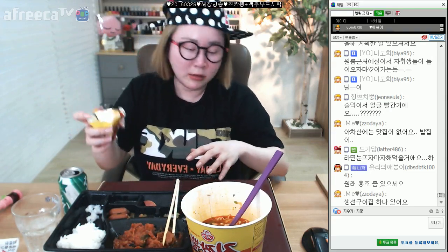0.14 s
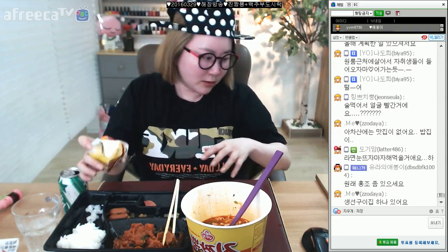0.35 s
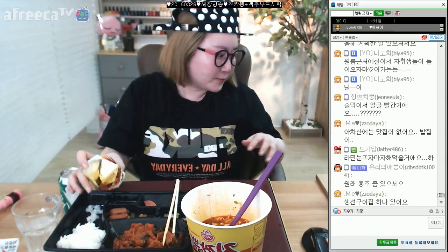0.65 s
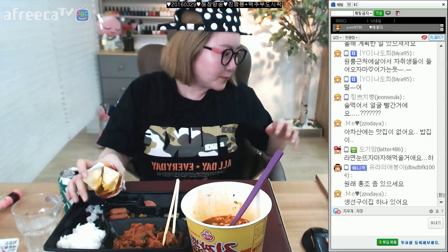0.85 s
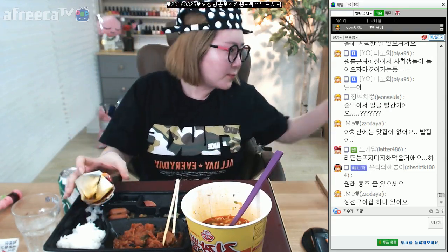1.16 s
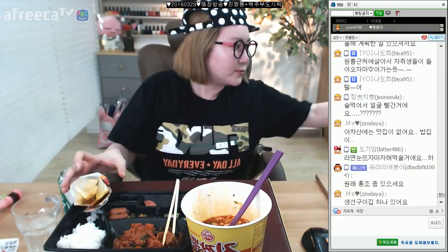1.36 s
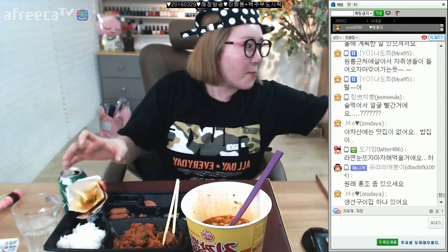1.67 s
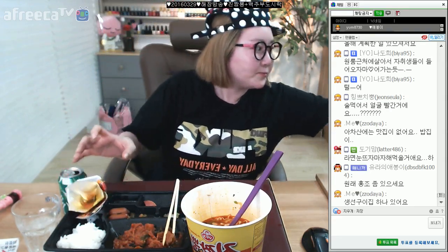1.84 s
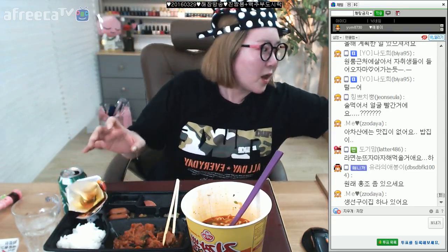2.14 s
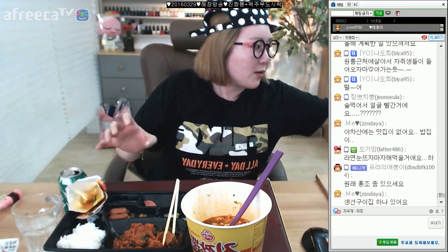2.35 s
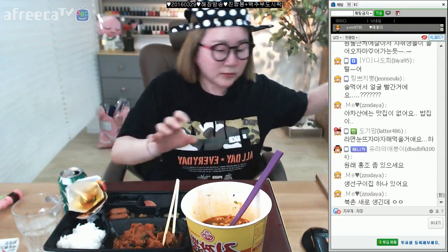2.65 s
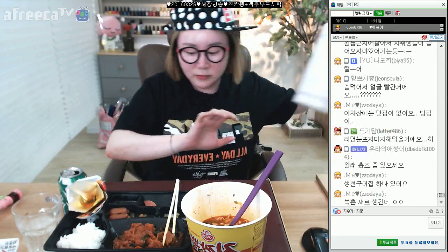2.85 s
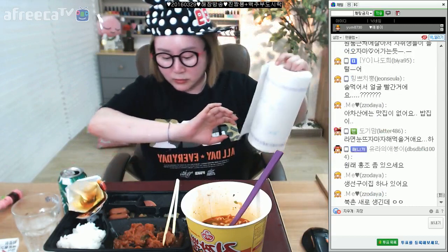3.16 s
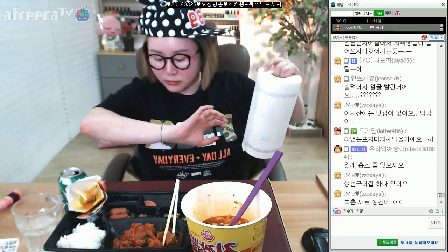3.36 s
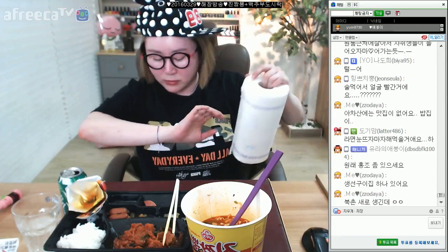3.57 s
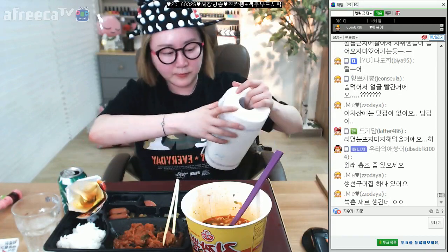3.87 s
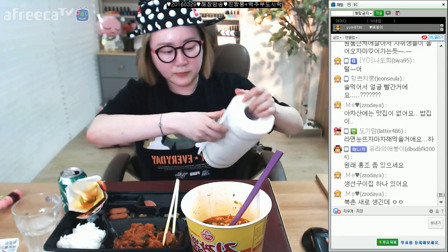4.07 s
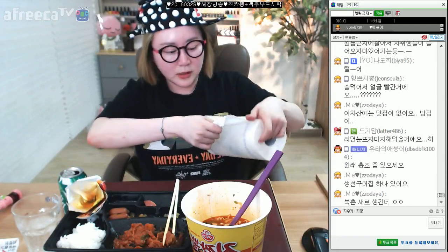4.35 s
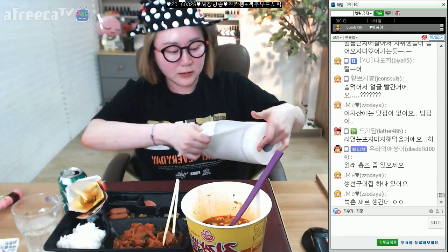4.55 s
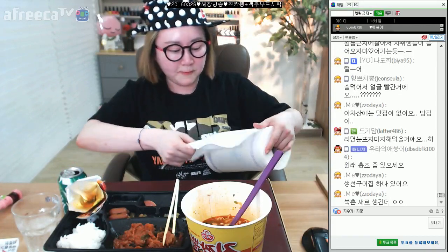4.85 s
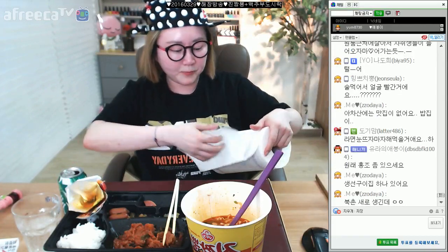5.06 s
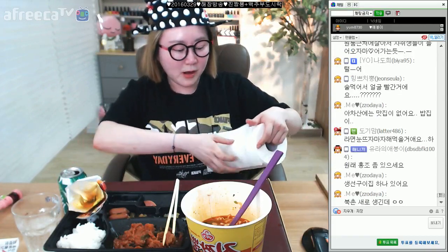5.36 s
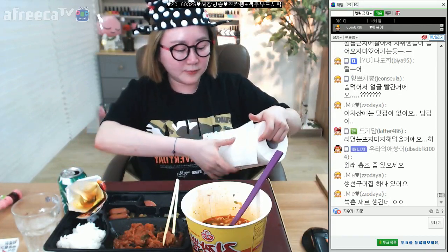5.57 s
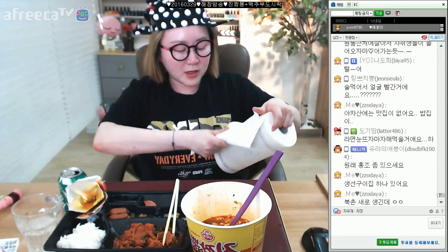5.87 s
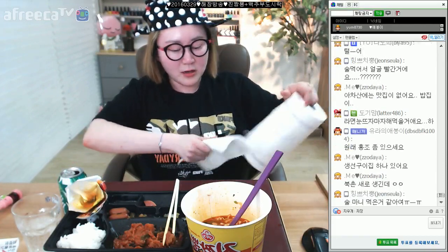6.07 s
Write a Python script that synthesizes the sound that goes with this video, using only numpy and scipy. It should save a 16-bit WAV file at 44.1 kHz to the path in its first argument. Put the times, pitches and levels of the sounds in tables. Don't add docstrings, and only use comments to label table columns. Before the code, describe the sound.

In a humming small room, wrapper crinkles, sharp wooden knocks and hollow cardboard bumps lead to paper rubbing and a loud final tear.

```python
import sys
import numpy as np
from scipy import signal
from scipy.fft import rfft, irfft, next_fast_len
from scipy.io import wavfile
from scipy.ndimage import uniform_filter1d, minimum_filter1d, map_coordinates

SR = 44100
rng = np.random.default_rng(int(sys.argv[2]) if len(sys.argv) > 2 else 0)


def field_ratio(decibels):
    return 10 ** (np.asarray(decibels, dtype=float) / 20)


def wrap_up_sound(samples):
    columns = np.atleast_2d(samples).T
    tamed = np.clip(columns, -1, 1)
    steps = np.round(tamed * 32767).astype(np.int16)
    wavfile.write(sys.argv[1], SR, steps)


N = 273993
TIME = np.arange(N) / SR
SPLIT_HZ = 3000

# [f/Hz, level/dB]
HUM = [(58.54, -32), (100.5, -74.5), (120, -61), (145.5, -58.5), (203, -79), (218, -64)]
# [f/Hz, level/dB per Hz]
AIR = [(15, -17), (40, -26), (80, -26), (110, -26), (250, -32.5), (400, -32.5), (766, -35.5), (877, -40.5),
       (1030, -34.5), (2380, -54), (5000, -60), (6500, -53.5), (10000, -64.5), (15700, -63)]
# [f/Hz, time to fall 60 dB/s]
ROOM = [(150, 0.3168), (1000, 0.23813), (4000, 0.31366), (12000, 0.255)]

# [peak t/s, swell t/s per 20 dB, release t/s per 20 dB, pressure level/dB, hiss over body level/dB]
CLOTH = [(.16, 0.414, 1.655, -57.5, -23), (.7, 1.222, 0.1208, -61.5, -4), (1.2, 0.1227, 0.7995, -52, -5.5),
         (1.3, 0.1886, 0.598, -57, -16), (1.46, 0.2102, 0.1733, -52, -11.5),
         (1.52, 0.1473, 0.08726, -58.5, 8), (1.56, 0.1172, 0.03123, -47, -10.5),
         (1.78, 1.024, 0.328, -58, -6.5)]
WRAPPER = [
    (.766, 0.7, 0.453, -70.5, -18.5),
    (.8, -0.0028, 0.0869, -51.5, -22.5),
    (.908, 0.3168, -0.2951, -43.5, -5),
    (.966, 0.2021, 0.2206, -40.5, -3),
]
SLIDE = [
    (1.97, 0.0635, 0.1492, -64.5, -17.5),
    (2.04, 0.06694, 0.083, -38.5, 6.5),
    (2.075, 0.0687, 0.03796, -37.5, 2),
    (2.16, 0.2393, 0.2058, -48, -16),
]
SLEEVE = [(2.238, 0.0408, 0.02587, -44.5, -4), (2.27, 0.0505, 0.4346, -53, -4.5),
          (2.488, 0.1045, 0.2911, -47.5, -8.5), (2.578, 0.0313, 0.12615, -44, 0.5),
          (2.63, 0.094, 0.1511, -49, 1), (3.024, 0.7045, 0.7564, -51.5, -8), (3.44, 1, 0.248, -59.5, -26.5),
          (3.68, 0.25, 0.2714, -55, -11.5)]
GRIP = [
    (3.84, 0.05394, 0.958, -50.5, 0.5),
    (3.95, 0.032, 0.0706, -40, -5),
    (4.045, 0.0794, 0.0672, -29, -11),
    (4.078, 0.0465, 0.0245, -33, -19.5),
    (4.16, 0.2244, 0.0542, -50.5, 6.5),
]
PAPER = [(4.292, 0.1209, 0.13805, -37, -5.5), (4.42, 0.3525, 0.3474, -47, -1),
         (4.484, 0.0628, 0.4845, -37.5, -7.5), (4.61, 0.528, 0.46, -39, -7),
         (4.796, 0.03225, 0.321, -38.5, -6), (4.93, 0.422, 0.517, -54, -12.5),
         (5.04, 0.08075, 0.02597, -45.5, -2)]
FOLD = [(5.09, 0.02686, 0.1046, -52, -5), (5.268, 0.1224, 0.3832, -50.5, -2.5),
        (5.582, 0.02441, 0.04078, -36, -9.5), (5.608, 0.00704, 0.03504, -40.5, -8.5),
        (5.718, 0.07184, 0.0546, -37.5, -7.5), (5.788, 0.1386, 0.2467, -35.5, -8.5),
        (5.9, 0.3654, 0.01319, -43, 2)]
TEAR = [
    (5.92, 0.01101, 0.0582, -17.5, -3),
    (5.962, 0.05134, 0.06599, -16, -17),
    (5.995, 0.04296, 0.0204, -17.5, -22),
    (6.05, 0.0966, 0.832, -48.5, -8),
]

# [f/Hz, level/dB per Hz]
CLOTH_TONE = [(180, -35), (300, -2.5), (372, -4), (439, -4), (485, -9), (686, -1.5), (1310, -11.5),
              (2410, -7.5), (3150, -10), (7320, -11), (15700, -31.5)]
WRAPPER_TONE = [(200, -3), (620, -4.5), (900, -2.5), (1400, -10), (1800, -3.5), (2000, -2), (2300, -10),
                (3500, -14), (5000, -19.5), (6500, -12.5), (8000, -29), (11000, -24), (15700, -46)]
SLIDE_TONE = [(180, -37), (300, -18), (446, -25.5), (527, 0), (783, -14), (1060, -14), (2230, -13.5),
              (2410, 2), (2600, -9.5), (3530, -6.5), (6000, -9.5), (8080, -0.5), (15700, -21)]
SLEEVE_TONE = [(180, -58.5), (300, -12.5), (321, -7.5), (509, -16), (664, -8), (1200, -15), (1330, -20),
               (1600, -14), (9700, -14), (15700, -25)]
GRIP_TONE = [(59, -81), (100, -14), (412, -7), (616, -4.5), (685, -18), (762, 6.5), (846, -4.5), (1160, 3),
             (1700, -5.5), (3490, -26.5), (4220, -36), (6310, -30.5), (15700, -46)]
PAPER_TONE = [(59, -42.5), (100, -8.5), (146, -5), (173, -18.5), (307, -9), (371, -8.5), (404, -4),
              (1110, -0.5), (2440, -6.5), (4130, -19.5), (7020, -18.5), (11900, -28), (15700, -34.5)]
FOLD_TONE = [(59, -44.5), (100, -7), (153, -2), (189, -28), (288, -0.5), (341, -16.5), (449, -3),
             (2010, -6), (5110, -8.5), (7320, -5), (15700, -22.5)]
TEAR_TONE = [(47, -55), (80, -18), (130, -20), (194, -27.5), (571, -13.5), (610, -4.5), (795, -12),
             (888, -11.5), (1110, -5), (1400, -14.5), (1970, -10), (6480, -26.5), (15700, -41.5)]

# [t/s, peak level/dB, ring f/Hz, fizz over ring level/dB]
TICKS = [(0.1364, -30, 2229, -9.5), (0.2702, -48, 1342, -1.5), (0.6487, -47, 1624, -3),
         (0.7987, -31.5, 2062, -8.5), (0.8817, -22, 2014, -15.5), (0.9056, -24, 1924, -14.5),
         (0.9107, -23, 2015, -21.5), (0.9249, -28.5, 2196, -9), (0.9327, -26.5, 1929, -7),
         (0.9665, -29, 904.5, -5), (0.9706, -21, 1811, -7.5), (0.978, -38.5, 3046, 1.5),
         (0.9994, -36, 1930, 5), (1.4106, -40, 2493, -9), (1.5292, -22.5, 3031, -13.5),
         (1.5300, -23.5, 2191, -21), (2.2278, -38.5, 2486, -2.5), (4.771, -36, 1591, 2.5),
         (5.332, -56.5, 1500, 1), (5.3472, -47, 1595, 8), (5.042, -34.5, 2548, -13),
         (5.3705, -45, 1299, -1), (5.5243, -38.5, 1287, -11), (5.5598, -35.5, 1235, -11.5)]
PUFFS = [(0.709, -47.5, 1987, -6.5), (0.763, -40.5, 1068, 5), (1.079, -28.5, 2381, -8.5),
         (2.574, -24.5, 1508, -8.5), (3.936, -20.5, 1204, -21), (3.946, -17.5, 1554, -20.5),
         (4.004, -24, 1259, -19.5), (4.031, -15.5, 3539, -15), (4.045, -15, 1139, -24.5),
         (4.074, -23, 780, -20), (2.212, -22, 883.8, -30), (4.321, -19.5, 2010, -10.5),
         (4.375, -26.5, 632.4, -25), (4.520, -21.5, 1014, -19), (4.569, -20, 1209, -14),
         (4.582, -27, 647.6, -25.5), (4.605, -29.5, 552.3, -25), (4.660, -26.5, 445, -28),
         (4.840, -23, 691, -20.5), (4.860, -22, 1051, -17.5), (4.920, -28, 676.2, -25.5),
         (5.012, -37.5, 704.3, -20), (5.078, -29, 902.6, -17), (3.990, -24.5, 1131, -20),
         (4.033, -13.5, 1191, -23), (4.066, -23.5, 935, 1.5), (4.237, -21.5, 2145, -7),
         (4.281, -30.5, 1460, -13.5), (4.489, -17.5, 1512, -15.5), (4.650, -30, 1362, -21),
         (4.793, -26, 890.4, 5), (5.572, -19, 1154, -15.5), (5.603, -18, 1111, -22),
         (5.605, -19, 2181, -17), (5.709, -19, 1963, -20.5),
         (.967, -10, 5000, -10.5), (0.63, -29.5, 6000, -10), (0.81, -34.5, 6400, -9.5),
           (1.2, -48.5, 1700, -21), (5.267, -31.5, 9000, 2), (4, -28, 2100, -25)]
RIPS = [(5.9085, -21, 2811, -1), (5.911, -10, 1257, -7.5), (5.9135, -16.5, 2747, -8),
        (5.9165, -16.5, 2497, -5.5), (5.9235, -15, 2598, -12.5), (5.938, -14.5, 1513, -16.5),
        (5.9415, -17.5, 2010, -8.5), (5.944, -18, 2569, -12.5), (5.9515, -6, 1095, -27),
        (5.9835, -5, 1962, -14), (5.990, -13.5, 795.3, -11.5), (6.020, -26.5, 1405, -25.5),
        (5.9195, -5.5, 2916, -3.5), (5.922, -9.5, 1624, -7), (5.926, -6.5, 788.5, -24.5),
        (5.930, -19.5, 2379, -20), (5.9335, -10.5, 1195, -22), (5.9465, -19.5, 2199, -10),
        (5.9495, -3.5, 1122, -26), (5.9585, 2, 1034, -25.5), (5.965, -4.5, 1131, -22.5),
        (5.975, -12, 877.2, -30), (5.9805, -1, 1032, -20.5), (5.987, -23.5, 1495, -14.5),
        (5.998, -8.5, 750, -24.5), (6.005, -14, 856.7, -15)]
# [f/Hz, level/dB per Hz]
FIZZ = [(2500, -17), (5000, 11), (7500, 12), (11000, -4), (15800, -13.5)]

# [t/s, peak level/dB]
KNOCK = [(1.824, -9.5), (1.831, -8), (1.841, -8.5), (1.849, -13), (1.869, -18), (1.878, -32.5),
         (1.891, -33.5)]
THUMP = [(1.8235, -3)]
SLAP = [(2.083, -17)]
PUSHES = [(.7987, -27.5), (4.036, -45.5), (4.072, -39.5), (4.238, -42.5), (4.282, -36), (5.347, -35.5),
          (5.71, -33.5)]
BUMP = [2.097, 2.118, 2.138, 2.165, 2.183, 2.205, 2.238, 2.285]

# [f/Hz, level/dB, time to fall 60 dB/s]
SHELF = [(210.26, -2.5, 0.1249), (276.9, -8.5, 0.0844), (391.77, -8.5, 0.19), (467, -21.5, 0.0689),
         (521.6, -9.5, 0.0836), (602.57, -7.5, 0.1048), (750, -10, 0.068), (911.6, -16.5, 0.078),
         (1022, 3, 0.07734)]
PANEL = [(150.49, -4, 0.17625), (171.8, -5.5, 0.1211), (192.43, -15, 0.08355)]
CORE = [(398.3, -28.5, 0.0761), (560.16, -5.5, 0.1125), (636.31, 2.5, 0.1448), (684, -20.5, 0.0421),
        (780, -4.5, 0.0769), (872.77, -8.5, 0.198)]
PALM = [(219.66, 1, 0.03845)]

# [f/Hz, level/dB per Hz]
SHELF_TONE = [(90, -55.5), (130, -15.5), (230, -9.5), (400, -2.5), (620, -1.5), (950, -7.5), (1440, -16.5),
              (1800, -13), (3370, -20), (7270, -34.5), (13600, -42), (15700, -53)]
CORE_TONE = [(71, -51.5), (120, -24.5), (326, -19.5), (416, -8), (500, -8.5), (638, -2.5), (707, -13.5),
             (767, -10), (2170, -31.5), (7370, -39.5), (15700, -49.5)]
SLAP_TONE = [(71, -42), (120, -1.5), (313, -12.5), (1110, 0), (2260, -8), (3470, -9), (5210, -14),
             (8330, -14), (15700, -39)]

# [f/Hz, bar over the nearby level/dB]
THINNING = [(4000, -30), (7000, -9), (9000, -3), (11000, 0), (15000, 3)]


def unit(x):
    return x / np.sqrt(np.mean(x ** 2) + 1e-20)


def along(points, hz):
    f, v = np.transpose(points)
    return np.interp(np.log(hz + 1), np.log(f + 1), v)


def wobble(rate, size=N):
    knots = rng.standard_normal(int(size * rate / SR) + 4)
    return map_coordinates(knots, [TIME[:size] * rate])


def filtered(x, response):
    m = next_fast_len(len(x) + 8192)
    return irfft(rfft(x, m) * response(np.fft.rfftfreq(m, 1 / SR)), m)[:len(x)]


def causal(tone, size=4096):
    gain = field_ratio(along(tone, np.fft.rfftfreq(size, 1 / SR)))
    ceps = irfft(np.log(gain + 1e-6), size)
    ceps[1:size // 2] *= 2
    ceps[size // 2 + 1:] = 0
    h = irfft(np.exp(rfft(ceps)), size)
    return h / np.linalg.norm(h)


def add(track, s, sound):
    part = track[round(s * SR):][:len(sound)]
    part += sound[:len(part)]


def patchy(depth_db, size):
    z = signal.stft(rng.standard_normal(size), nperseg=256)[2]
    field = uniform_filter1d(rng.standard_normal(z.shape), size=4, axis=0)
    field = uniform_filter1d(field, size=5, axis=1)
    noise = signal.istft(z * field_ratio(depth_db * unit(field)), nperseg=256)[1]
    return unit(noise[:size])


def room(x):
    hz, t, z = signal.stft(rng.standard_normal(min(len(x), SR // 3)), SR, nperseg=256)
    decay = field_ratio(-60 * t / along(ROOM, hz)[:, None])
    tail = signal.istft(z * decay, SR, nperseg=256)[1]
    delayed = np.pad(x, (200, 0))
    return signal.fftconvolve(delayed, tail / np.linalg.norm(tail))[:len(x)]


def rub(strokes, tone, grains, slips_db, patchy_db, flutter_db, hiss_grows):
    s, rise, fall, press_db, hiss_db = np.transpose(strokes)[:, :, None]
    first = max(round(strokes[0][0], 1) - .5, 0)
    n = 5 * SR // 2
    t = first + np.arange(n) / SR
    below_db = -20 * np.maximum((s - t) / abs(rise), (t - s) / abs(fall))

    chance = grains / SR * field_ratio(5 * wobble(25, n))
    starts = (rng.random(n) < chance) * field_ratio(rng.normal(0, 2.537, n))
    grain = field_ratio(-60 * TIME[:300] / 0.008546)
    bursts = signal.fftconvolve(starts, grain)[:n] * rng.standard_normal(n)
    force = field_ratio(slips_db) * unit(bursts) + patchy(patchy_db, n)
    force = force * field_ratio(flutter_db * wobble(41.263, n))

    low = lambda hz: 1 / (1 + (hz / SPLIT_HZ) ** 6)
    body = unit(filtered(force, lambda hz: field_ratio(along(tone, hz)) * low(hz)))
    hiss = unit(filtered(force, lambda hz: field_ratio(along(tone, hz)) * (1 - low(hz))))
    body_gain = np.linalg.norm(field_ratio(press_db + below_db), axis=0)
    hiss_gain = np.linalg.norm(field_ratio(press_db + hiss_db + hiss_grows * below_db), axis=0)
    out = np.zeros(N)
    add(out, first, body_gain * body + hiss_gain * hiss)
    return out


def snaps(events, rise, rough, ring_s, thud_hz, thud_db, fizz_t60, wet_db):
    out = np.zeros(N)
    t = np.arange(SR // 5) / SR
    colour = causal(FIZZ, size=256)
    swell = 1 - np.exp(-(t / rise) ** 2)
    for s, db, hz, fizz_db in events:
        ring_t60 = ring_s * np.sqrt(1000 / hz)
        wander = rough * np.cumsum(rng.standard_normal(len(t)))
        ring = np.sin(2 * np.pi * hz * t + wander) * field_ratio(-60 * t / ring_t60)
        thud = field_ratio(thud_db - db / 2 - 60 * t / 0.04505) * np.sin(2 * np.pi * thud_hz * t)
        noise = np.convolve(rng.standard_normal(len(t)), colour)[:len(t)]
        fizz = field_ratio(fizz_db - 3.0 - 60 * t / fizz_t60) * noise
        dry = field_ratio(db) * swell * (ring + thud + fizz)
        add(out, s, dry + field_ratio(wet_db) * room(dry))
    return out


def blows(contacts, modes, tone, rise, ring_db, rattle_db, rattle_t60, wet_db):
    out = np.zeros(N)
    t = np.arange(SR // 2) / SR
    colour = causal(tone)
    for s, db in contacts:
        since_first = t + s - contacts[0][0]
        ring = 0
        for hz, level, t60 in modes:
            decay = field_ratio(level + rng.normal(0, 2.372) - 60 * t / t60)
            ring = ring + decay * np.sin(2 * np.pi * hz * since_first)
        shake = rng.standard_normal(len(t)) * field_ratio(-60 * t / rattle_t60)
        rattle = signal.fftconvolve(shake, colour)[:len(t)]
        dry = field_ratio(db + ring_db) * (1 - np.exp(-t / rise)) * ring + field_ratio(db + rattle_db) * rattle
        add(out, s, dry + field_ratio(wet_db) * room(dry))
    return out


def air():
    hum = np.zeros(N)
    for hz, db in HUM:
        level = np.sqrt(2) * field_ratio(db + .6 * wobble(5))
        hum += level * np.sin(2 * np.pi * hz * TIME + .15 * wobble(4))
    noise = filtered(rng.standard_normal(N), lambda hz: field_ratio(along(AIR, hz)))
    heard = filtered(noise, lambda hz: hz > 200)
    return hum + field_ratio(-51.5 + 0.1967 * wobble(1.963)) * noise / np.std(heard)


def sleeves():
    return rub(CLOTH, CLOTH_TONE, grains=590, slips_db=-9.5, patchy_db=3, flutter_db=1.4012, hiss_grows=1.0)


def wrapper():
    return rub(WRAPPER, WRAPPER_TONE, grains=330, slips_db=-12, patchy_db=3.5, flutter_db=2.5,
               hiss_grows=1.6985)


def small_taps():
    return snaps(TICKS, rise=0.0002512, rough=0.1035, ring_s=0.014034, thud_hz=196.8, thud_db=-39,
                 fizz_t60=0.026954, wet_db=-9.5)


def shelf_knock():
    board = blows(KNOCK, SHELF, SHELF_TONE, rise=0.000521, ring_db=-21.5, rattle_db=-3.5,
                  rattle_t60=0.12326, wet_db=-7.5)
    side = blows(THUMP, PANEL, SHELF_TONE, rise=.006, ring_db=0, rattle_db=-30, rattle_t60=.05, wet_db=-12)
    return board + side


def roll_slide():
    slide = rub(SLIDE, SLIDE_TONE, grains=590, slips_db=-11.5, patchy_db=2.0, flutter_db=-1.0,
                hiss_grows=1.2004)
    sleeve = rub(SLEEVE, SLEEVE_TONE, grains=560, slips_db=-10.5, patchy_db=0.5, flutter_db=1.0312,
                 hiss_grows=1.2187)
    return slide + sleeve


def roll_bumps():
    slap = blows(SLAP, CORE, SLAP_TONE, rise=0.001031, ring_db=-8.5, rattle_db=-4.0,
                 rattle_t60=0.0527, wet_db=-0.5)
    settling = [(s, -16.5 - 91.5 * (s - BUMP[0])) for s in BUMP]
    bumps = blows(settling, CORE, CORE_TONE, rise=0.00552, ring_db=-11.5, rattle_db=-6.5,
                  rattle_t60=0.11014, wet_db=-3)
    return slap + bumps


def palm_pushes():
    return blows(PUSHES, PALM, SLAP_TONE, rise=0.002943, ring_db=0, rattle_db=-20.5,
                 rattle_t60=0.03415, wet_db=-7)


def crumples():
    return snaps(PUFFS, rise=0.007373, rough=.135, ring_s=0.04608, thud_hz=250.5, thud_db=-28,
                 fizz_t60=0.038126, wet_db=-5)


def paper_handling():
    grip = rub(GRIP, GRIP_TONE, grains=300, slips_db=-11, patchy_db=1.5, flutter_db=1.3, hiss_grows=.8)
    unroll = rub(PAPER, PAPER_TONE, grains=540, slips_db=-7, patchy_db=-0.5, flutter_db=0.7011,
                 hiss_grows=0.8479)
    fold = rub(FOLD, FOLD_TONE, grains=230, slips_db=-10.5, patchy_db=2.0, flutter_db=-0.5, hiss_grows=1.358)
    return grip + unroll + fold


def tearing():
    rasp = rub(TEAR, TEAR_TONE, grains=320, slips_db=1, patchy_db=3.5, flutter_db=0.0516, hiss_grows=1.9)
    rips = snaps(RIPS, rise=0.0001449, rough=.09, ring_s=0.012706, thud_hz=275.36, thud_db=-36,
                 fizz_t60=0.00919, wet_db=-11)
    return rasp + rips


def scene():
    before = air() + sleeves() + wrapper() + small_taps()
    fall = shelf_knock() + roll_slide() + roll_bumps()
    paper = palm_pushes() + crumples() + paper_handling() + tearing()
    return (before + fall + paper)[None]


def thinned(x):
    start = 815
    hz, _, z = signal.stft(x[start:], SR, "cosine", nperseg=2048)
    level = 10 * np.log10(np.sum(abs(z[hz > SPLIT_HZ]) ** 2, axis=0) + 1e-20)
    change = abs(np.diff(level, prepend=level[0]))
    jump = -minimum_filter1d(-change, size=2)

    nearby = lambda v: np.sqrt(abs(uniform_filter1d(abs(v) ** 2, size=41, axis=0))) + 1e-12
    usual = np.median(nearby(z), axis=1)[:, None]
    follows = .75
    bar = nearby(z) ** follows * usual ** (1 - follows) * field_ratio(along(THINNING, hz))[:, None]
    kept = z * ((abs(z) > bar) | (jump > 5))
    kept = kept * np.minimum(nearby(z) / nearby(kept), 2)
    rest = signal.istft(kept, SR, "cosine", nperseg=2048)[1]
    return np.r_[x[:start], rest][:len(x)]


def top_cut(x):
    return signal.sosfilt(signal.butter(12, 15760, fs=SR, output="sos"), x)


def record(dry):
    soft = dry / (1 + abs(dry / .8) ** 6) ** (1 / 6)
    band = filtered(thinned(soft[0]), lambda hz: hz < 15760)[None]
    return top_cut(band)


dry = scene()
out = record(dry)
wrap_up_sound(out)
```